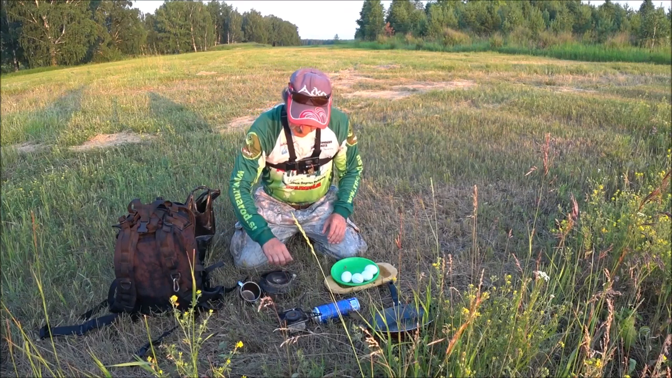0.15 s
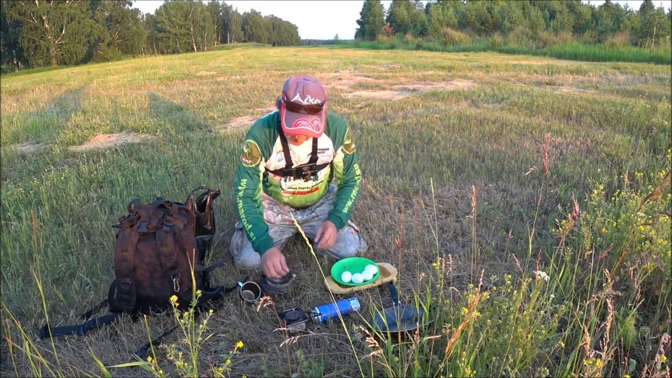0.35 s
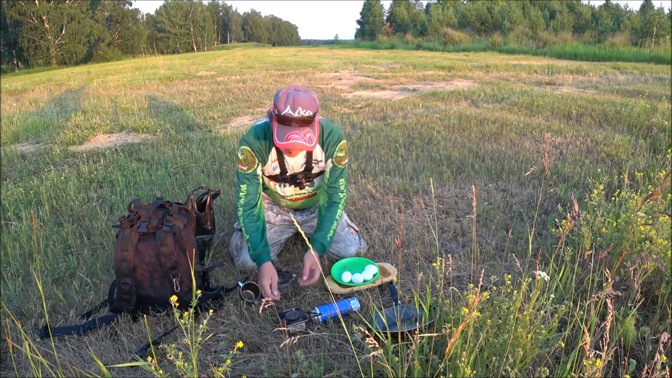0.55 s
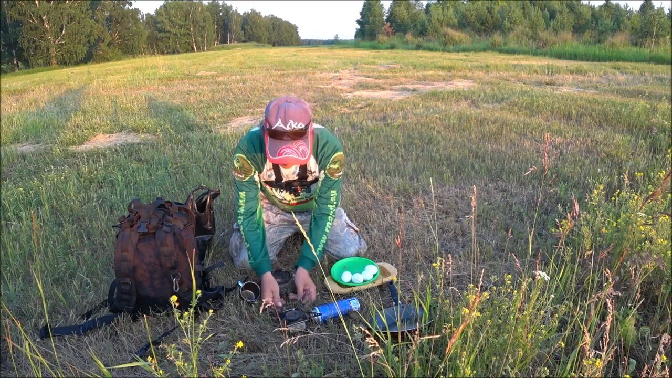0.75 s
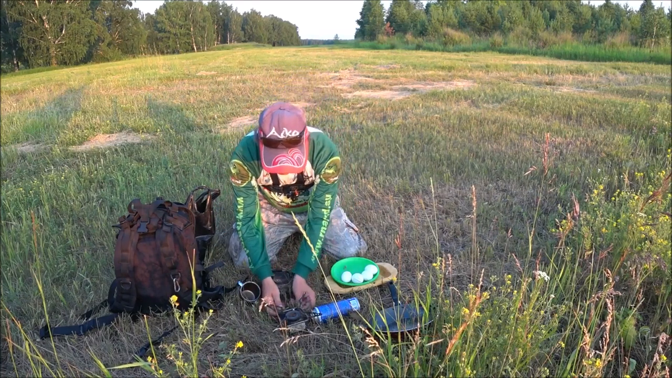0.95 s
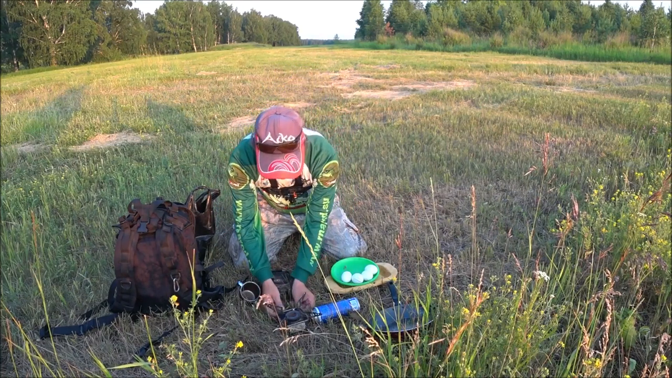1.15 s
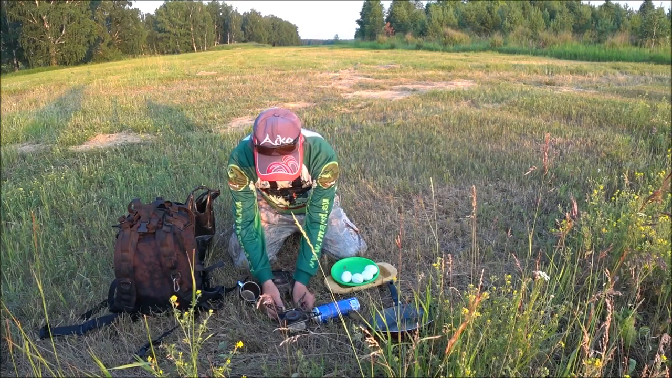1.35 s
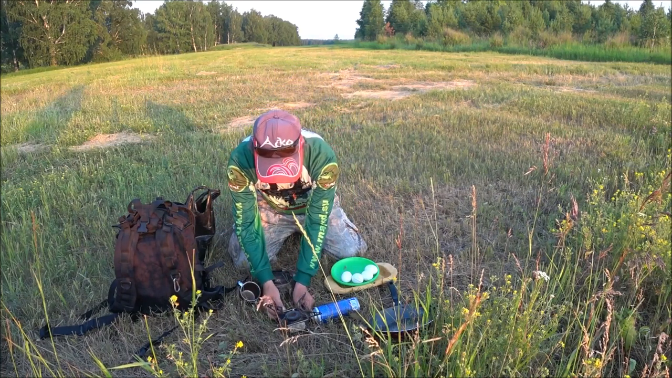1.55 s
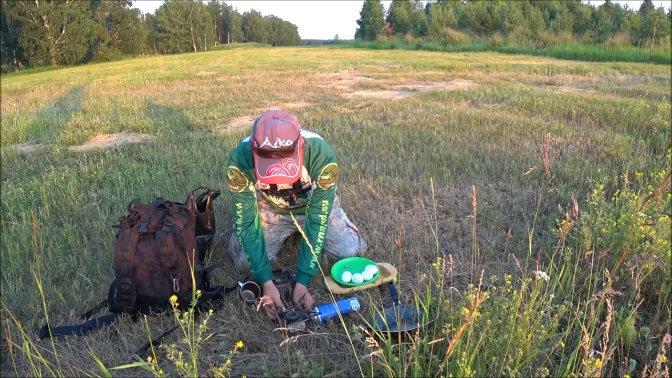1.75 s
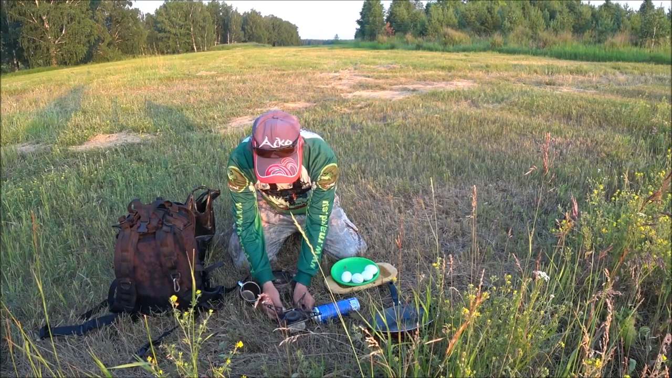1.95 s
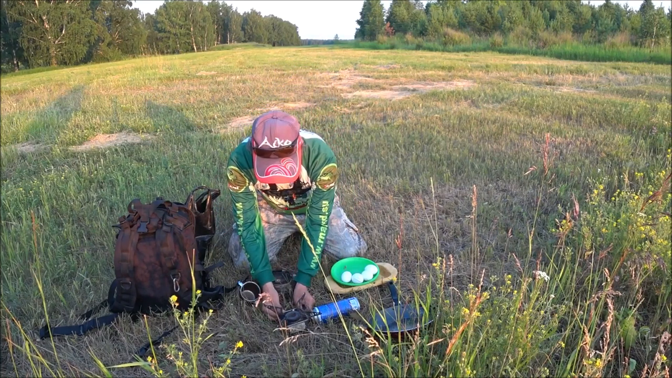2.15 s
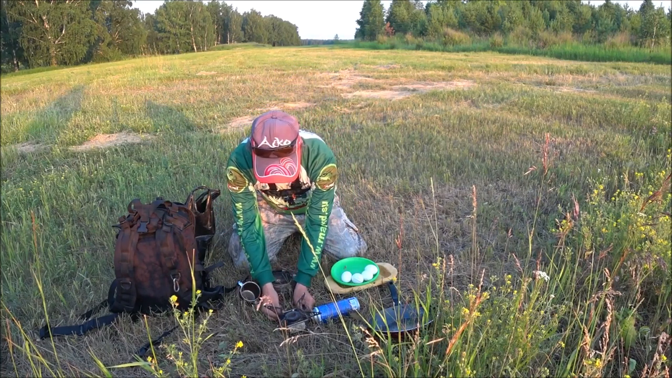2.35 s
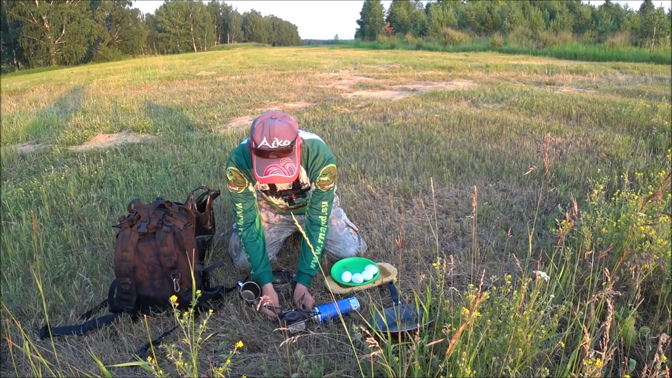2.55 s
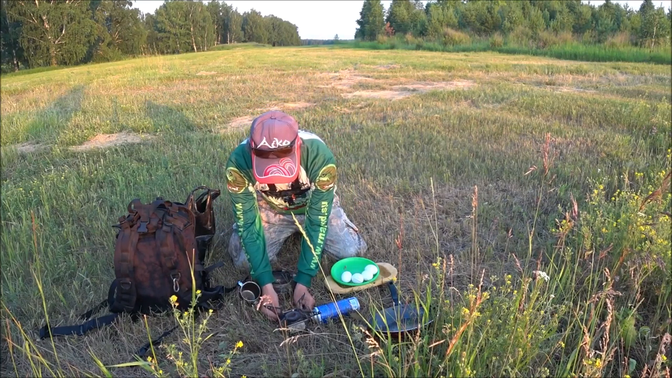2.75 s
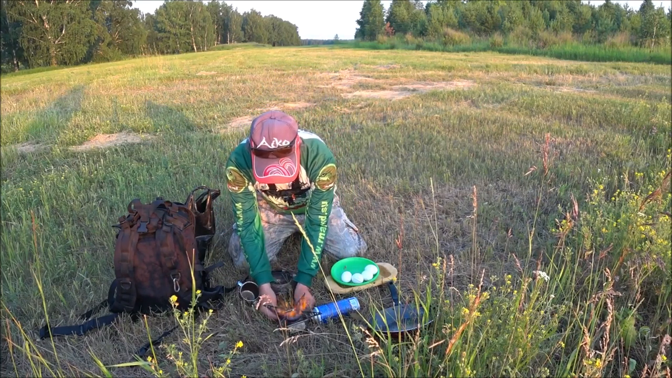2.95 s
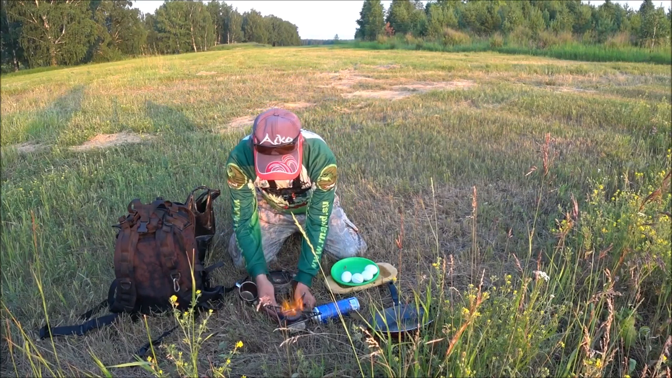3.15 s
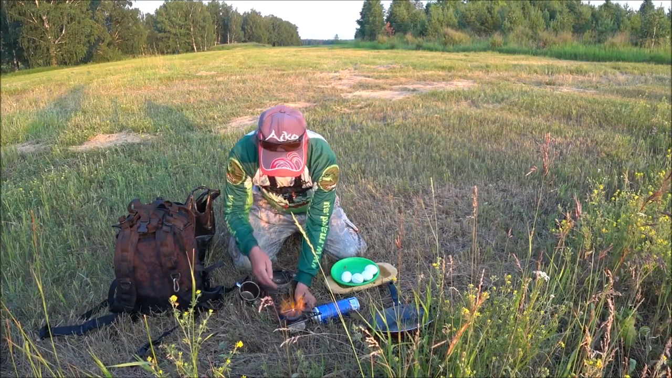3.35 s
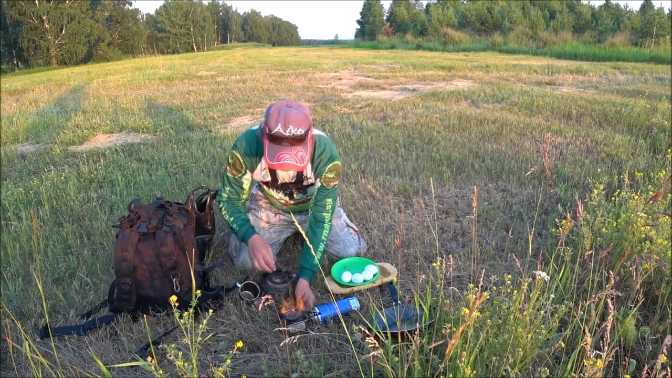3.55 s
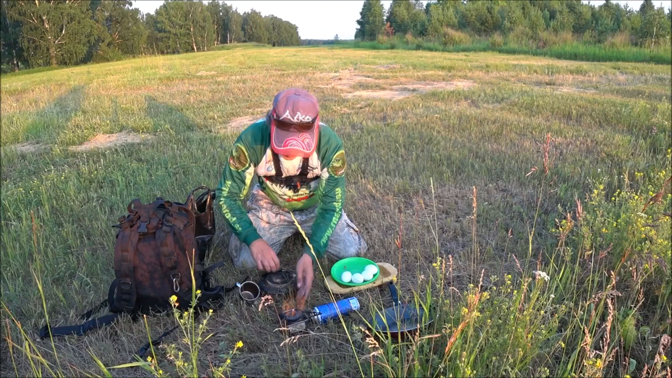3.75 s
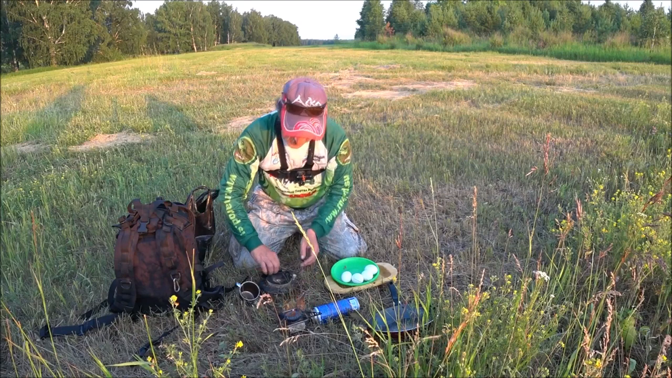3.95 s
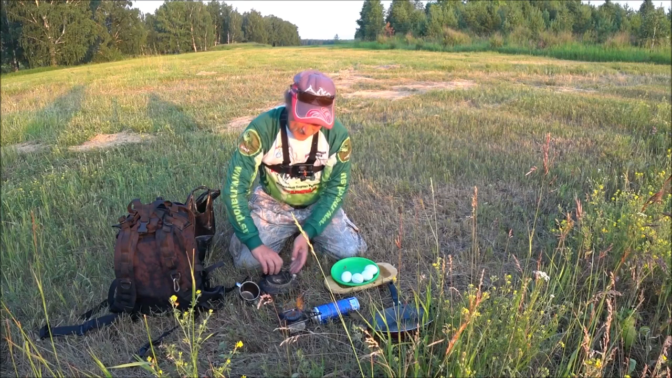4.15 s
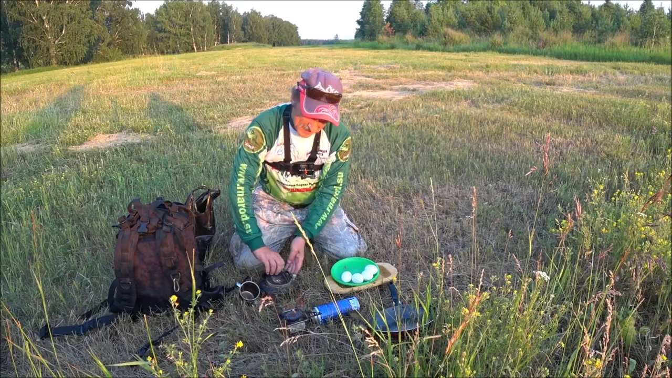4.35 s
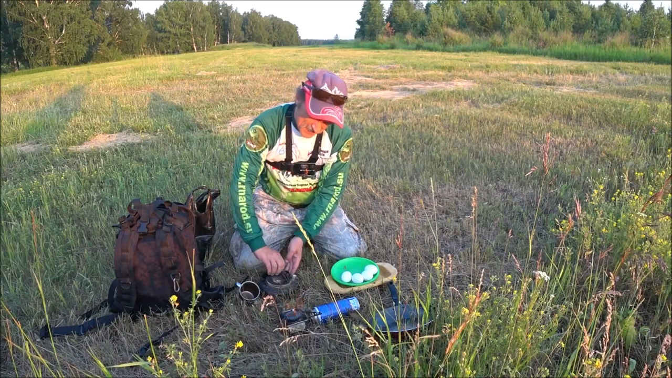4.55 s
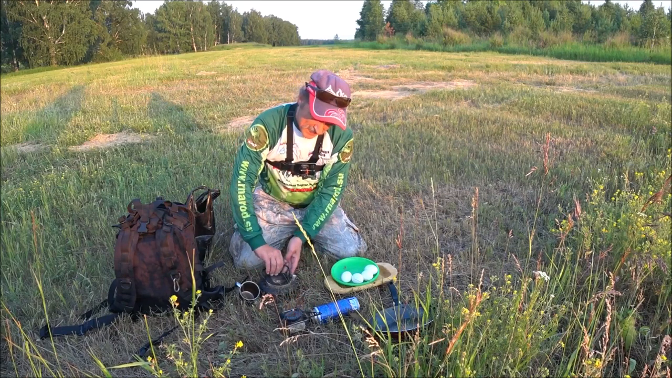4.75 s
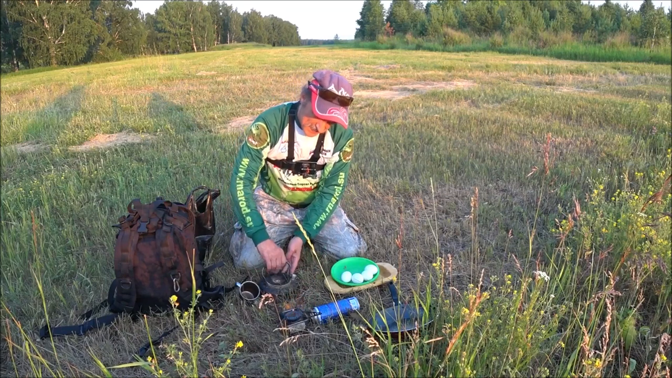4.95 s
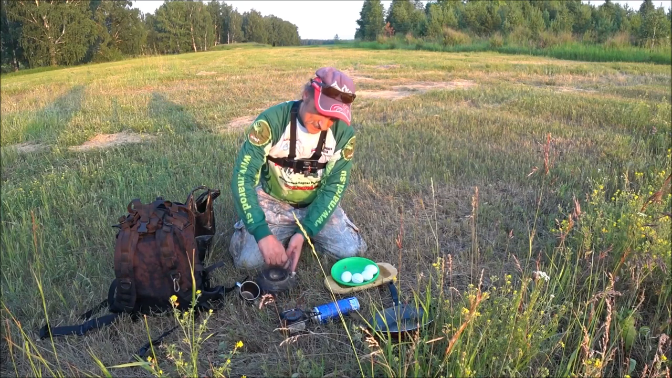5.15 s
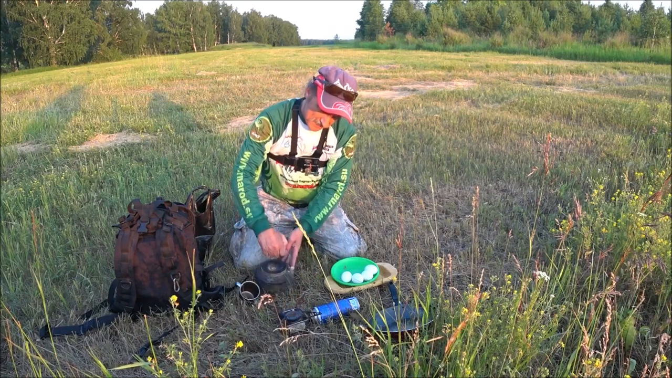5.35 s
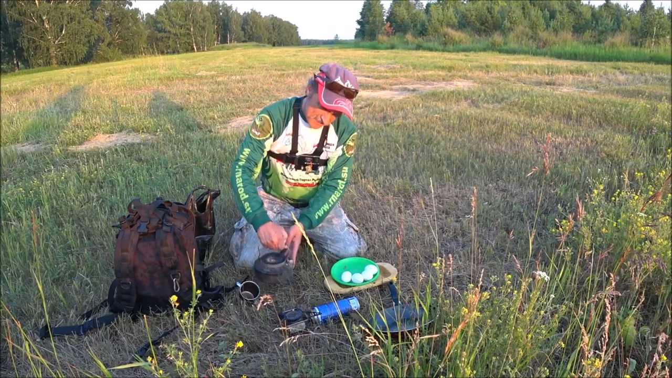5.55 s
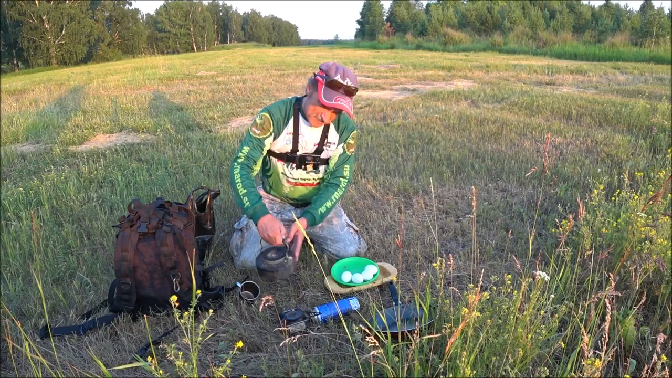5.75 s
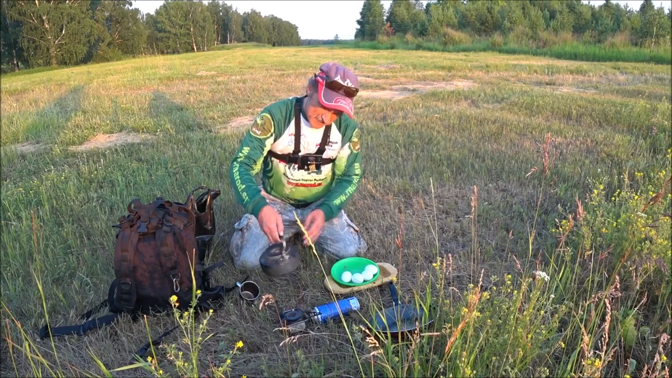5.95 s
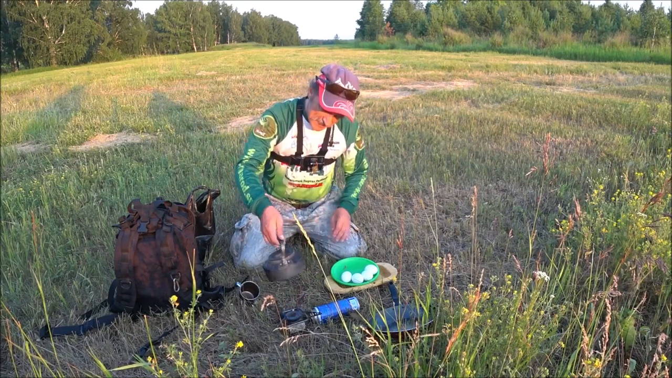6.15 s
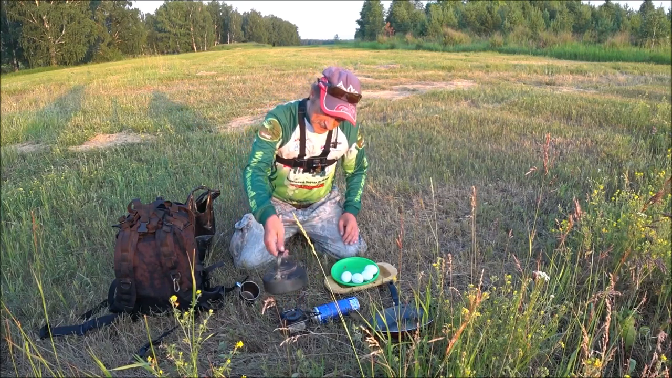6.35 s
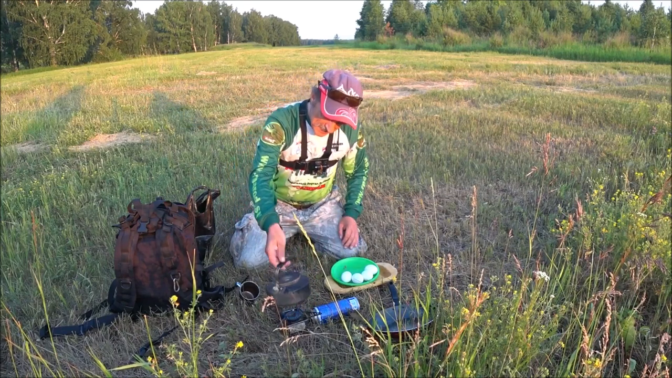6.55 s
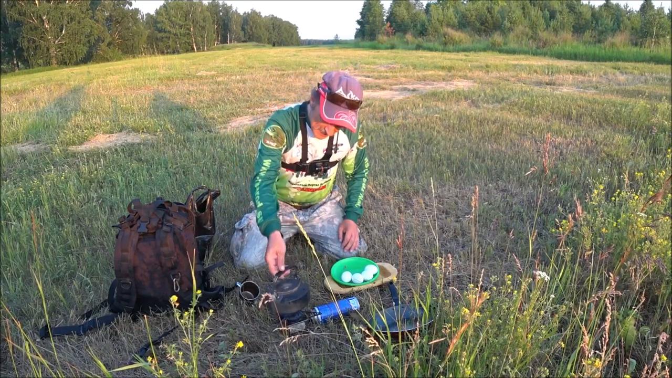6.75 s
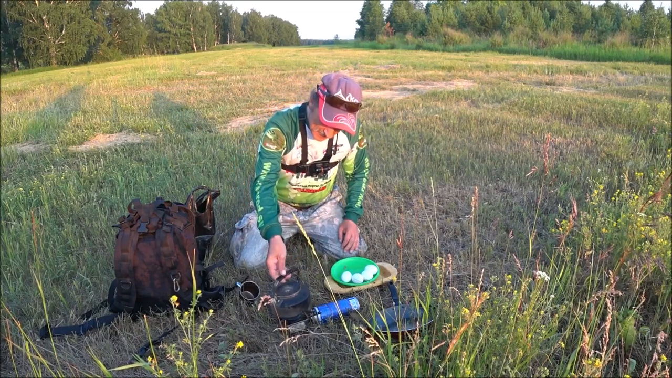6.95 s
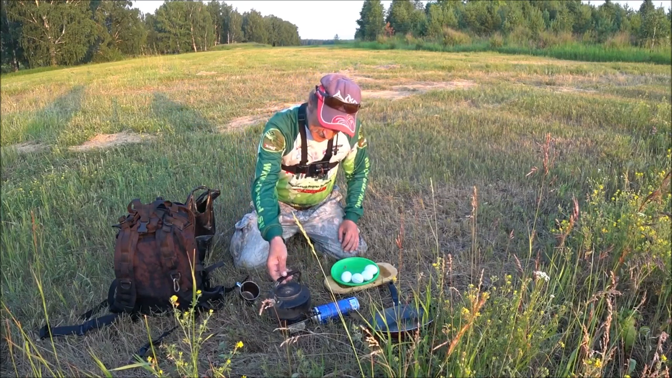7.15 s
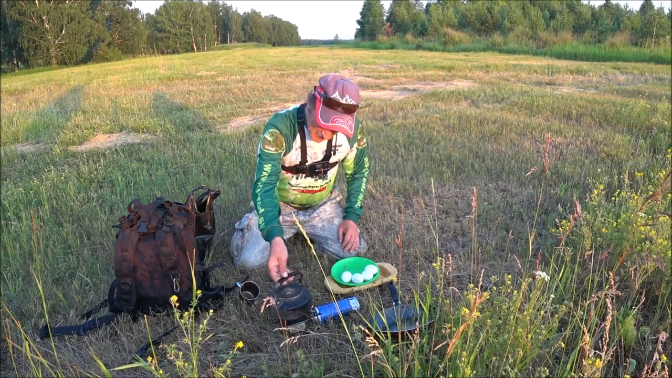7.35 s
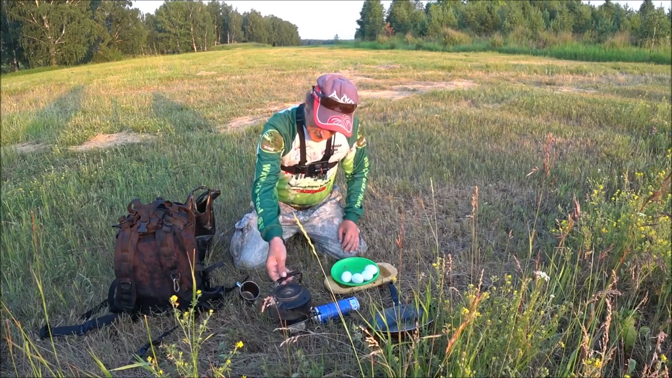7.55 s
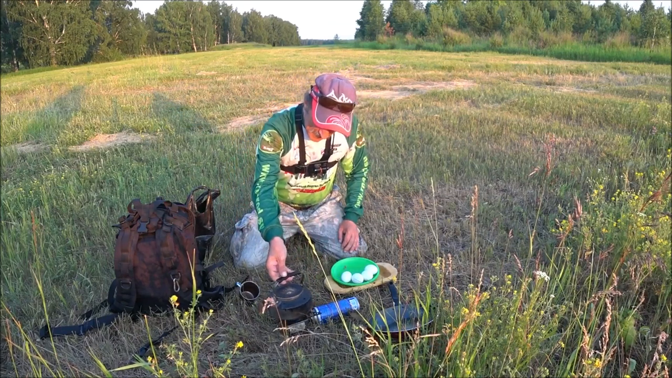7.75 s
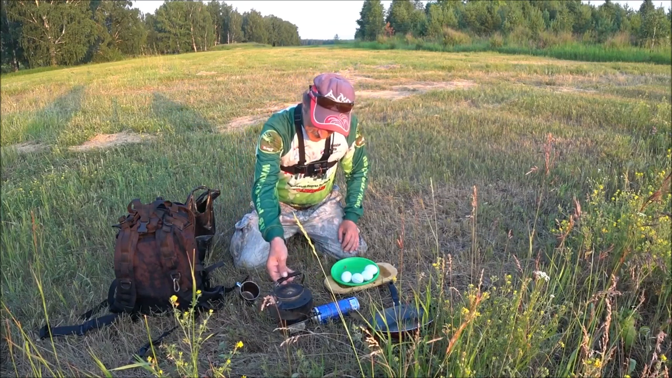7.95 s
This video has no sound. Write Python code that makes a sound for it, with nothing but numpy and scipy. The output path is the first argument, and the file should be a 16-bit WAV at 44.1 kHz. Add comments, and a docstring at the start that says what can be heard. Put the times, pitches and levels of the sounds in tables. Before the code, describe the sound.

A small gas stove is lit close by in a quiet field with softly rustling leaves. Cloth brushes, the valve ticks open and a steady hiss begins. Two loud igniter clicks light the burner, which goes on hissing above a soft, unsteady rumble of flame. Then a metal kettle is set on top with a brief rattle and a few light clinks, muffling the flame.

```python
"""A camper kneels at a small gas stove in a field of rustling leaves and grass. A sleeve swishes, stalks
tick, fingers scrape and the gas knob creaks open. Cold gas hisses: jet noise rings the burner's hollows.
The igniter snaps twice, the flame catches and roars, and hot gas retunes the hollows. Last, a kettle set
on top retunes them again, muffles the flame and clanks on the pot rests."""
import sys
import numpy as np
from scipy import signal
from scipy.fft import rfft, irfft
from scipy.io import wavfile
from scipy.ndimage import uniform_filter1d

SR = 44100
rng = np.random.default_rng(int(sys.argv[2]) if len(sys.argv) > 2 else 0)


def transcribe(signal):
    """Save signal, clipped to [-1, 1], as a 16-bit WAV file at the path in sys.argv[1]."""
    frames = np.atleast_2d(signal).T
    limited = np.clip(frames, -1, 1)
    pcm = np.round(limited * 32767).astype(np.int16)
    wavfile.write(sys.argv[1], SR, pcm)


N = 353108
TIME_S, BIN_HZ = np.arange(N) / SR, np.arange(N // 2 + 1) * SR / N

# leaves and grass: freq_hz, density_db
FIELD_SPECTRUM = [(15, -14), (25, -4.5), (197, -10), (241, -8.5), (311, -9.5), (531, -9), (603, -10),
                  (862, -12), (1060, -9.5), (3870, -19), (11000, -30.5), (14300, -59), (22000, -120)]
# their left-right likeness: freq_hz, correlation
FIELD_CORRELATION = [(60, 0.89), (130, 0.51), (270, -0.054), (570, -0.53), (1210, -0.16), (2570, -0.0068),
                     (5450, 0.35), (11600, 0.12)]
# rubbing cloth: freq_hz, density_db
CLOTH_SPECTRUM = [(880, -9.5), (1500, -6), (1730, -17), (2600, -2.5), (4660, -3.5), (6240, -7), (8490, -29),
                  (11000, -17.5), (14300, -49), (22000, -120)]
# fabric squeak: time_s, pitch_hz, level_db
CLOTH_SQUEAK = [(.465, 6400, -66), (.478, 6050, -55.5), (.497, 6400, -52.5), (.512, 6250, -55.5),
                (.524, 5800, -57.5), (.53, 5700, -68)]
# stalks, cloth and valve: start_s, peak_db, centre_hz, t60_s
SMALL_TICKS = [(.5506, -41, 4500, .03), (0.573, -34, 4400, .01), (0.5808, -30.5, 4370, 0.0067),
               (.578, -50, 330, .03), (.592, -38, 4000, .01), (.62, -42, 2700, 0.012),
               (.845, -52, 10400, .02), (.898, -53, 3700, 0.014), (1.2336, -50, 9800, .02),
               (1.3633, -48, 4970, .02), (1.609, -38.5, 1380, 0.036)]
# fingers on the knob: start_s, hold_s, level_db, centre_hz
FINGER_SCRAPES = [(1.06, 0.12, -69, 4000), (1.35, .015, -64, 5600), (1.437, 0.031, -62, 5270)]
# knob slipping on its seat: start_s, thump_peak_db, tick_peak_db
KNOB_SLIPS = [(1.072, -46, -51), (1.09, -51, -56), (1.101, -42.5, -48), (1.118, -48, -49),
              (1.137, -41.5, -48), (1.177, -45.5, -42), (1.369, -50, -52), (1.428, -50, -54),
              (1.441, -55, -52), (2.098, -48, -50), (2.124, -48, -50), (2.204, -44.5, -50),
              (2.238, -41.5, -48), (2.259, -42, -26)]
# stove body: freq_hz, gain_db, t60_s
STOVE_MODES = [(221, 7, .07), (464, -9, 0.052)]
# gas jet: time_s, level_db
JET_LEVEL = [(1.598, -66), (1.612, -51), (1.68, -48.5), (1.8, -46), (2.7, -45), (3.1, -45.5), (3.37, -44),
             (4.76, -43.5), (5.65, -44.5), (6.35, -43.5), (6.52, -45.5), (6.69, -51), (8.01, -52)]
# burner hollows when cold, lit and under the kettle: centre_hz, width_hz, gain_db
COLD_HOLLOWS = [(936, 140, -8), (1380, 290, -7.5), (1760, 770, -15.5), (2480, 490, -1.5), (3260, 230, 0.5),
                (3670, 215, 2), (4320, 410, -6.5), (4940, 190, -4), (5504, 123, 3), (5800, 93, -6),
                (6220, 220, -7), (7050, 160, -15), (7380, 210, -13), (8200, 500, -25), (9070, 600, -12.5),
                (10200, 220, -12), (10720, 350, -11)]
LIT_HOLLOWS = [(1050, 500, -16.5), (1535, 480, -13.5), (2480, 440, -13.5), (2796, 56, -7.5),
               (3340, 156, -6.5), (3742, 290, 1), (3980, 420, -11), (4300, 360, -4.5), (5177, 330, -6.5),
               (5850, 130, -14), (6200, 250, -24), (6700, 580, -30), (7273, 87, -9.5), (8000, 1000, -49),
               (9500, 430, -34), (9420, 330, -19.5), (10030, 160, -18), (10700, 430, -25.5)]
COVERED_HOLLOWS = [(1080, 420, -8.5), (1750, 120, -22), (2550, 660, -6), (3330, 240, -11.5), (3860, 210, 2),
                   (4380, 110, 1), (4900, 180, -9), (5490, 92, 0.5), (6120, 170, -8), (7330, 150, -13),
                   (6840, 500, -24), (8000, 500, -27), (9230, 300, -11), (10260, 380, -9),
                   (10800, 200, -20)]
# igniter snaps and rebounds: start_s, peak_db, rattle_s, tilt_db_per_octave
IGNITER_SNAPS = [(2.7803, -9, 0.0046, 2.5), (2.7886, -22, 0.0015, -7), (2.9807, -25, 0.0013, 4),
                 (2.9823, -8, 0.0012, 18.5), (2.986, -16, 0.004, 1)]
# igniter housing: freq_hz, gain_db, t60_s
IGNITER_MODES = [(1496, -2.5, 0.027), (2720, -1, 0.0058), (3460, 0, 0.0088), (4500, 12, 0.0057),
                 (6070, 3, 0.0036), (7200, 2, 0.0036), (8300, -5, 0.0034), (9200, -6, 0.0025),
                 (10230, -7.5, 0.0058)]
# pooled gas catching, kettle squeezing the flame: start_s, hold_s, roar_db, puff_db
FLARE_UPS = [(2.799, 0.096, -48, -42.5), (3.055, 0.079, -49.5, -54), (4.137, 0.017, -51.5, -62),
             (6.517, 0.027, -47.5, -62), (6.64, 0.047, -45.5, -65), (6.772, 0.032, -46.5, -66),
             (7.237, 0.095, -57.5, -68), (7.713, 0.1, -56, -72)]
# steady flame: time_s, level_db
FLAME_LEVEL = [(2.9, -62), (2.95, -48.5), (3.2, -57.5), (3.56, -52.5), (3.65, -60), (3.8, -51.5),
               (4.5, -51), (4.87, -51.5), (5.3, -50), (5.9, -50), (6.35, -49.5), (6.8, -54.5), (7.0, -64),
               (8.01, -64.5)]
# flame roar and flare-up puff: freq_hz, density_db
ROAR_SPECTRUM = [(25, -28), (60, -5.5), (130, 1), (250, -3), (400, -1), (520, -12), (700, -13.5),
                 (1200, -16.5), (2500, -30)]
PUFF_SPECTRUM = [(20, -17), (50, -2), (110, 2), (170, 0.5), (320, -10), (600, -41)]
# kettle touching the pot rests: start_s, peak_db
KETTLE_CONTACTS = [(6.9158, -32), (6.922, -33.5), (6.931, -37), (6.942, -41), (7.231, -39), (7.258, -44),
                   (7.708, -41.5), (7.8, -45)]
# kettle body: freq_hz, gain_db, t60_s
KETTLE_MODES = [(320, -5.5, 0.12), (690, -6, 0.041), (1110, -14, .02), (1465, -3, 0.032), (1880, -1, 0.022),
                (2290, -10, 0.011), (2650, 0, 0.017), (2990, 0, 0.028), (3530, 3.5, .012),
                (4300, -12, .008), (5200, -17, .006)]
# balance of the near sounds: freq_hz, left_minus_right_db
NEAR_BALANCE = [(60, 1.1), (350, 0.5), (1100, 2), (3600, 0.6), (6400, 3), (11000, 1)]
# scatter off grass and ground: freq_hz, gain_db
GROUND_SCATTER = [(60, -28.5), (500, -20), (2500, -22), (6000, -14.5), (11000, -12)]

LIGHTING_SPAN_S, COVERING_SPAN_S = (2.84, 3.14), (6.56, 6.9)


def undb(db):
    return 10 ** (np.asarray(db) / 20)


def per_sample(table):
    """Value columns of a time table at every sample; -120 outside it."""
    time_s, *columns = np.transpose(table)
    return [np.interp(TIME_S, time_s, column, left=-120., right=-120.) for column in columns]


def per_bin(table):
    """Value column of a frequency table at every bin."""
    freq_hz, value = np.transpose(table)
    return np.interp(np.log(BIN_HZ + 1), np.log(freq_hz), value)


def colour(x, bin_gain):
    return irfft(rfft(x) * bin_gain, N)


def noise(bin_gain):
    """Coloured noise, rms 1."""
    x = colour(rng.standard_normal(N), bin_gain)
    return x / x.std()


def wander(rate_hz):
    """Random steps smoothed twice; spread near 1."""
    hold = int(SR / rate_hz)
    steps = np.repeat(rng.standard_normal(N // hold + 1), hold)
    return 1.3 * uniform_filter1d(uniform_filter1d(steps, hold), hold)[:N]


def ramp(span_s):
    return np.interp(TIME_S, span_s, (0, 1))


def swell(start_s, hold_s, level_db, attack_s, release_s):
    """Gain: up 20 dB per attack_s until start_s, held, down 20 dB per release_s."""
    t = TIME_S - start_s
    return undb(level_db + 20 * np.minimum(0, np.minimum(t / attack_s, (hold_s - t) / release_s)))


def add(out, start_s, sound, peak_db):
    i = int(start_s * SR)
    out[i:i + len(sound)] += undb(peak_db) * sound / np.abs(sound).max()


def tick(centre_hz, t60_s, edge_ratio=1.24):
    """Decaying burst of band noise."""
    t = np.arange(4000) / SR
    edges_hz = centre_hz / edge_ratio, min(edge_ratio * centre_hz, .45 * SR)
    band = signal.butter(2, edges_hz, "band", fs=SR, output="sos")
    return signal.sosfilt(band, rng.standard_normal(len(t)) * 1000. ** (-t / t60_s))


def ring(modes, rattle_s=0.00034, tilt_db_per_octave=0., impact=3.):
    """Decaying modes driven by a sharp impact and a short rattle."""
    t = np.arange(6000) / SR
    tones = 0
    for freq_hz, gain_db, t60_s in modes:
        gain = undb(gain_db + tilt_db_per_octave * np.log2(freq_hz / 4000))
        tones += gain * np.sin(2 * np.pi * freq_hz * t) * 1000. ** (-t / t60_s)
    contact = rng.standard_normal(len(t)) * np.exp(-t / rattle_s)
    contact[0] = impact
    return signal.fftconvolve(tones, contact)[:len(t)]


def field(level_db=-60.5):
    """Distant leaves and grass in light air; wide in the midrange."""
    correlation, gain = per_bin(FIELD_CORRELATION), undb(per_bin(FIELD_SPECTRUM))
    mid = colour(rng.standard_normal(N), gain * np.sqrt(1 + correlation))
    side = colour(rng.standard_normal(N), gain * np.sqrt(1 - correlation))
    return undb(level_db + wander(2.35)) * np.array([mid + side, mid - side]) / mid.std()


def sleeve():
    """Synthetic cloth rubs: grainy swish, brief squeak."""
    pitch_hz, level_db = per_sample(CLOTH_SQUEAK)
    squeak = undb(level_db + 2.9 * wander(148)) * np.sin(2 * np.pi * np.cumsum(pitch_hz) / SR)
    swish = swell(start_s=0.49, hold_s=.16, level_db=-52.5, attack_s=0.16, release_s=0.095)
    grain = undb(1.6 * wander(120.4))
    return swish * grain * noise(undb(per_bin(CLOTH_SPECTRUM))) + squeak


def small_ticks():
    """Stalks, cloth and valve tick."""
    out = np.zeros(N)
    for start_s, peak_db, centre_hz, t60_s in SMALL_TICKS:
        add(out, start_s, tick(centre_hz, t60_s), peak_db)
    return out


def fingers():
    """Grainy scraping as the knob is gripped."""
    grain, out = undb(3 * wander(200)), np.zeros(N)
    for start_s, hold_s, level_db, centre_hz in FINGER_SCRAPES:
        band = noise(1 / (1 + ((BIN_HZ - centre_hz) / (0.22 * centre_hz)) ** 2))
        out += swell(start_s, hold_s, level_db, attack_s=.03, release_s=.04) * band
    return grain * out


def knob():
    """Each slip on the seat ticks and thumps the stove body."""
    out = np.zeros(N)
    for start_s, thump_db, tick_db in KNOB_SLIPS:
        add(out, start_s, ring(STOVE_MODES), thump_db)
        add(out, start_s, tick(centre_hz=3700, t60_s=.02, edge_ratio=1.4), tick_db)
    return out


def burner(hollows, flicker_db=.9):
    """Jet noise rings one band per hollow; each flickers on its own. Rms 1."""
    out = np.zeros(N)
    for centre_hz, width_hz, gain_db in hollows:
        resonance = undb(gain_db) / (1 + (2 * (BIN_HZ - centre_hz) / width_hz) ** 2) ** 0.6
        out += undb(flicker_db * wander(24)) * colour(rng.standard_normal(N), resonance)
    return out / out.std()


def gas_jet():
    """Hiss through the cold, lit, then covered burner; equal-power crossfades."""
    lit, covered = ramp(LIGHTING_SPAN_S), ramp(COVERING_SPAN_S)
    hiss = (np.sqrt(1 - lit) * burner(COLD_HOLLOWS)
            + np.sqrt(lit - covered) * burner(LIT_HOLLOWS)
            + np.sqrt(covered) * burner(COVERED_HOLLOWS))
    return undb(per_sample(JET_LEVEL)[0] + .6 * wander(60)) * hiss


def igniter(low_cut_hz=950):
    """Snaps and rebounds ring a housing too small to radiate bass."""
    out = np.zeros(N)
    low_cut = signal.butter(5, low_cut_hz, "high", fs=SR, output="sos")
    for start_s, peak_db, rattle_s, tilt_db_per_octave in IGNITER_SNAPS:
        snap = ring(IGNITER_MODES, rattle_s, tilt_db_per_octave)
        add(out, start_s, signal.sosfilt(low_cut, snap), peak_db)
    return out


def flame(split_hz=180, covered_bass_db=-1, attack_s=0.028, release_s=0.026):
    """Unsteady burning: rumble and roar flutter apart; flare-ups lift the roar and add a deep puff."""
    burn = noise(undb(per_bin(ROAR_SPECTRUM)))
    roar = colour(burn, 1 / (1 + (split_hz / (BIN_HZ + 1)) ** 4))
    rumble = burn - roar
    steady_gain = undb(per_sample(FLAME_LEVEL)[0])
    roar_power, puff_gain = steady_gain ** 2, np.zeros(N)
    for start_s, hold_s, roar_db, puff_db in FLARE_UPS:
        roar_power += swell(start_s, hold_s, roar_db, attack_s, release_s) ** 2
        puff_gain += swell(start_s, hold_s, puff_db, attack_s, release_s)
    rumble_gain = steady_gain * undb(covered_bass_db * ramp(COVERING_SPAN_S))
    flutter = lambda: undb(1.6 * wander(16) + 1.8 * wander(30))
    return (rumble_gain * flutter() * rumble
            + np.sqrt(roar_power) * flutter() * roar
            + puff_gain * noise(undb(per_bin(PUFF_SPECTRUM))))


def kettle():
    """The kettle rattles on the pot rests and rings."""
    out = np.zeros(N)
    for start_s, peak_db in KETTLE_CONTACTS:
        add(out, start_s, ring(KETTLE_MODES, rattle_s=0.0038, impact=5.), peak_db)
    return out


def spread(near):
    """Pan slightly left; grass and ground scatter a little sound differently to each side."""
    tail = rng.standard_normal(4000) * np.exp(-np.arange(4000) / 700)
    side = colour(near, undb(per_bin(GROUND_SCATTER)) * rfft(tail / np.linalg.norm(tail), N))
    pan = undb(per_bin(NEAR_BALANCE) / 2)
    return np.array([colour(near, pan) + side, colour(near, 1 / pan) - side])


def scene():
    far = field()
    near = sleeve() + small_ticks() + fingers() + knob() + gas_jet() + igniter() + flame() + kettle()
    return far + spread(near)


def record(dry):
    """Steep low-pass."""
    cutoff_hz = 11030
    return signal.sosfilt(signal.ellip(12, .3, 60, cutoff_hz, fs=SR, output="sos"), dry)


dry = scene()
out = record(dry)
transcribe(out)
```